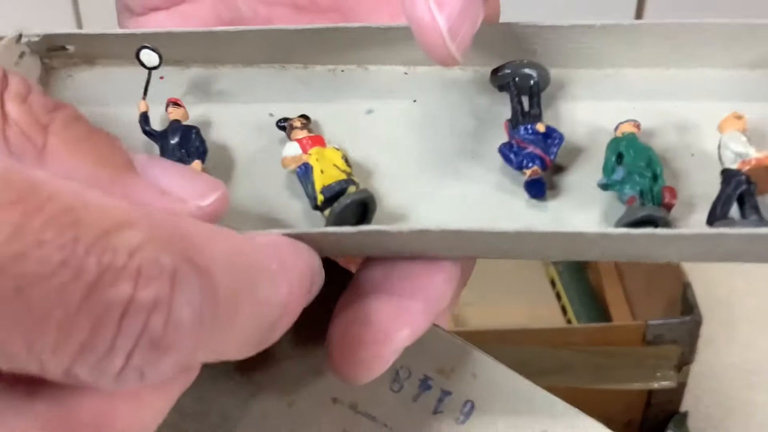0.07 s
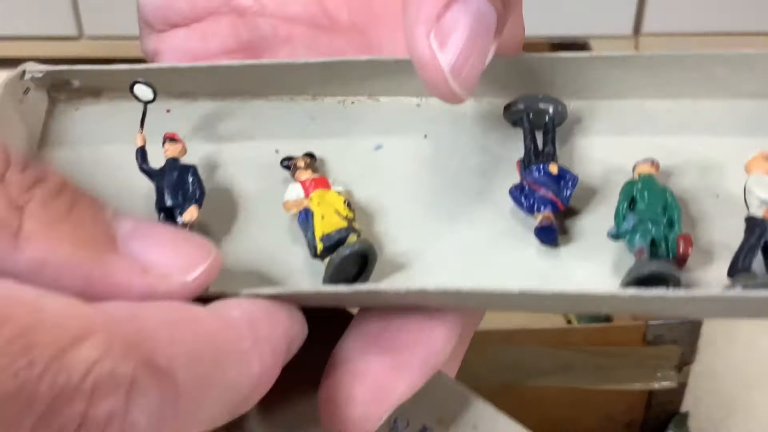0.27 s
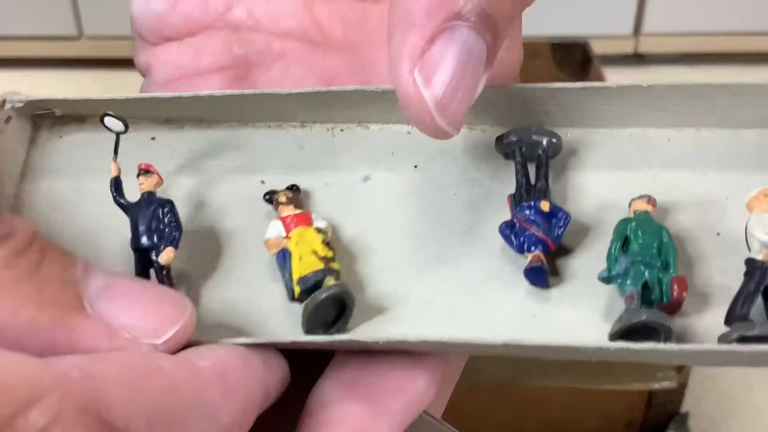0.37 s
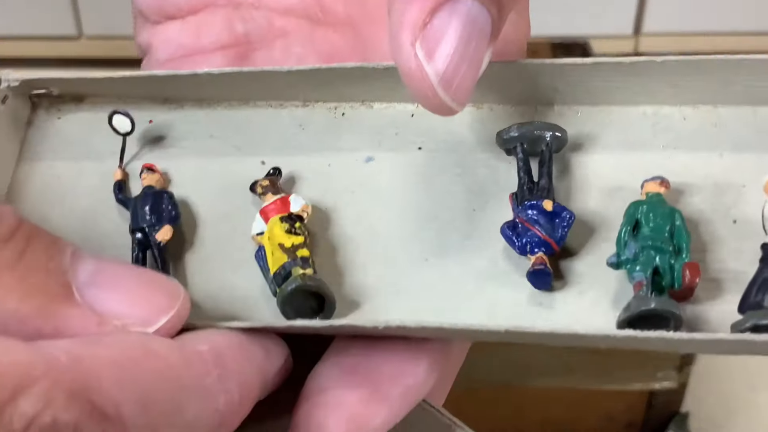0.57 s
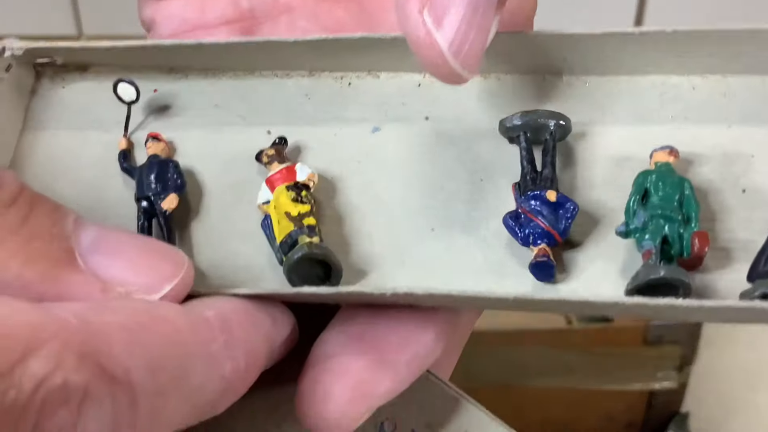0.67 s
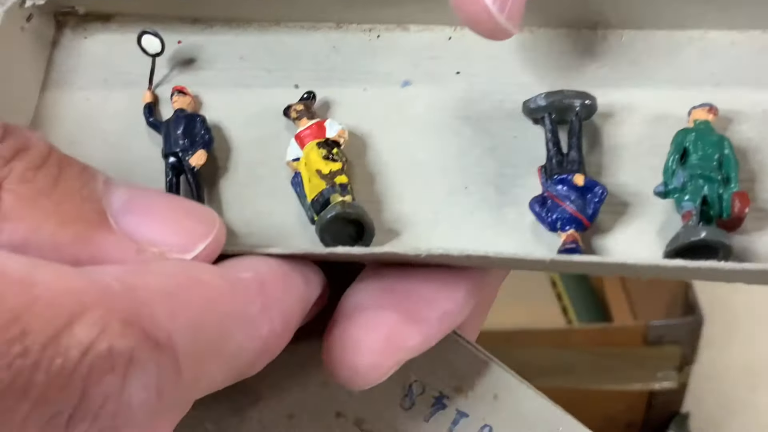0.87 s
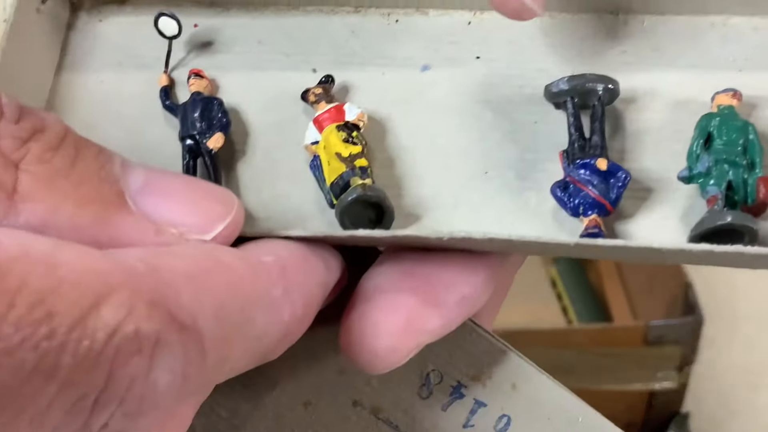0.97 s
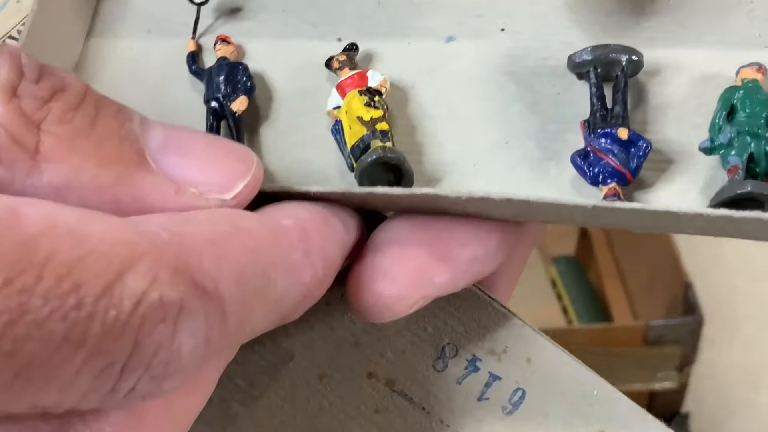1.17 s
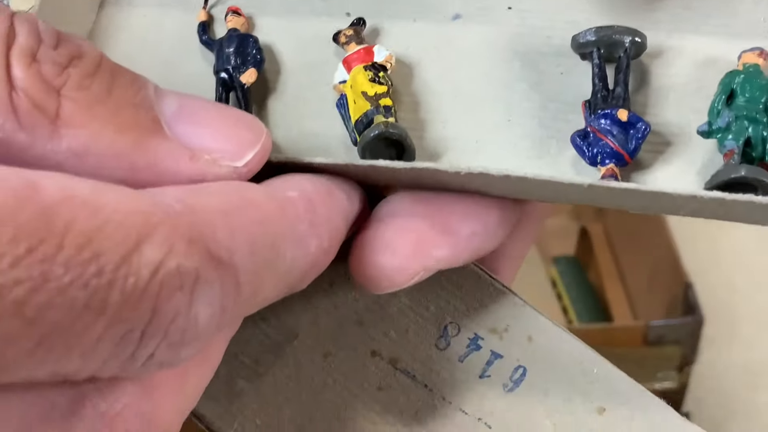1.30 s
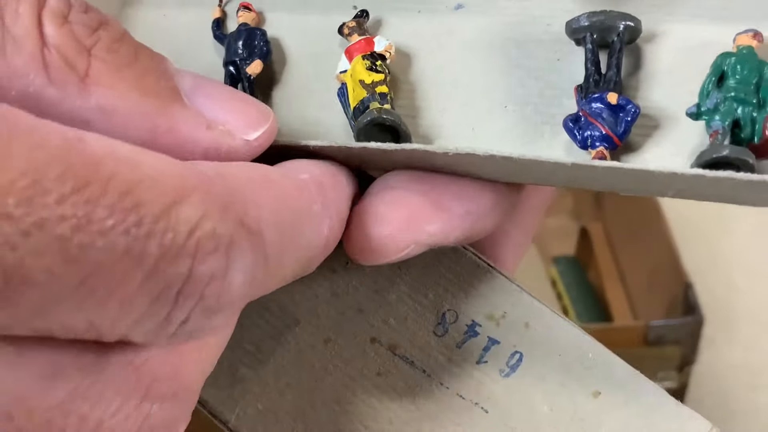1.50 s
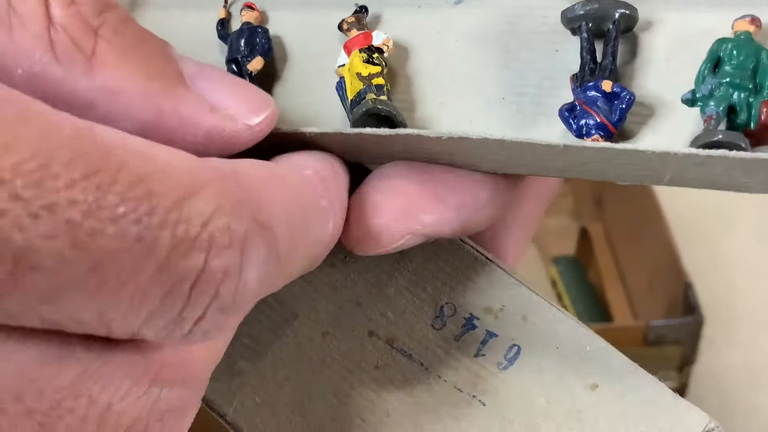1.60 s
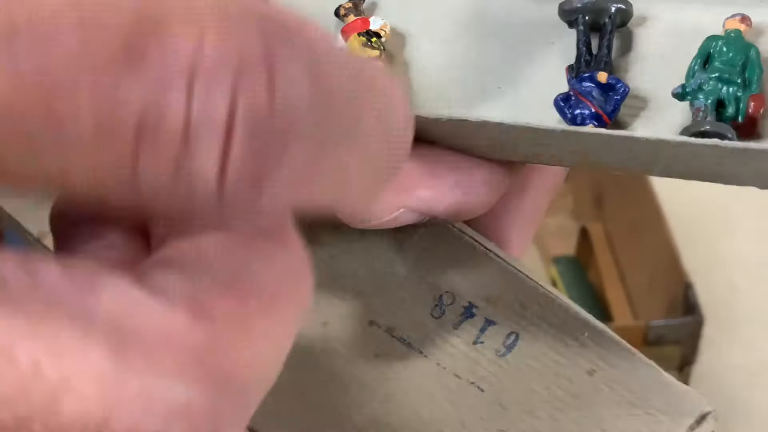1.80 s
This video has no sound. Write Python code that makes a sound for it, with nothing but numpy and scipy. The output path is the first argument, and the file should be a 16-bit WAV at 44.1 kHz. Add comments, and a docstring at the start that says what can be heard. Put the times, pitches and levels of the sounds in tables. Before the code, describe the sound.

A small cardboard tray is handled up close in a quiet room. Skin hiss and dry scraping swell from 0.2 to 0.4 s, with two quick taps near 0.24. A loud, sharp click lands at 0.44, a softer one at 0.51, then scraping and light taps around 0.7 to 0.8. After that it is nearly quiet, with brief faint scuffs near 1.26 and 1.7 over a low hum.

```python
"""A small cardboard tray is turned in two hands close to a phone, in a quiet room.
Skin rubs the card with a fine hiss, and the card scrapes and drags: random tiny slips, coloured by filters.
A few taps ring the tray's decaying modes, each with a crack of noise and a low thump; palms bump softly.
Sparse reflections, room noise and a faint wavering hum lie under it all.
The two microphones hear the sound with different delay, phase and tone."""
import sys
import numpy as np
from scipy import signal
from scipy.fft import rfft, irfft, next_fast_len
from scipy.io import wavfile
from scipy.ndimage import uniform_filter1d

SR = 44100
rng = np.random.default_rng(int(sys.argv[2]) if len(sys.argv) > 2 else 0)


def gain_from_decibels(decibels):
    """Convert decibel values to linear amplitude factors."""
    exponent = np.asarray(decibels, float) / 20
    return 10 ** exponent


def output_pcm(signal):
    """Save a mono or channel-first signal as 16-bit PCM at the path in sys.argv[1].

    Samples are clipped to [-1, 1] before scaling.
    """
    pcm = np.clip(np.atleast_2d(signal).T, -1, 1) * 32767
    wavfile.write(sys.argv[1], SR, np.round(pcm).astype(np.int16))


N = 81585  # length in samples


def evened(x):
    """Scales to rms 1."""
    return x / np.sqrt(np.mean(x ** 2) + 1e-20)


def read(points, hz):
    """Reads a table on a log-frequency axis."""
    f, value = np.transpose(points)
    return np.interp(np.log(hz + 1), np.log(f + 1), value)


def colour(x, gain):
    """Filters by a gain given as a function of frequency."""
    size = next_fast_len(x.shape[-1] + 4096)
    spectrum = rfft(x, size) * gain(np.fft.rfftfreq(size, 1 / SR))
    return irfft(spectrum, size)[..., :x.shape[-1]]


def grit(per_s, spread_db, flutter_db):
    """Tiny slips at random moments and sizes, clumped by a quick flutter."""
    size = gain_from_decibels(spread_db * np.minimum(rng.exponential(1, N), 5))
    sign = rng.choice([-1., 1.], N)
    happens = rng.random(N) < per_s / SR
    flutter = evened(uniform_filter1d(uniform_filter1d(rng.standard_normal(N), 250), 250))
    return size * sign * happens * gain_from_decibels(flutter_db * flutter)


# How the hands move. Each row: time in seconds, then the levels in dB of the dull drag,
# the scrape and the skin hiss.
MOTION = [(0.0, -55, -60, -56.5), (0.034, -49.5, -54.5, -48), (0.114, -62.5, -63, -54.5),
          (0.126, -68, -95, -64), (0.152, -62, -66, -61.5), (0.164, -63, -56, -42),
          (0.178, -59, -60.5, -54.5), (0.23, -47, -39.5, -41), (0.26, -47, -48.5, -38),
          (0.338, -45, -38.5, -39), (0.4, -44.5, -41, -51.5), (0.43, -50.5, -55, -58),
          (0.47, -59, -53, -79), (0.486, -70.5, -55, -49), (0.505, -50, -54, -72),
          (0.54, -45.5, -52.5, -55), (0.596, -48, -45.5, -54), (0.658, -56.5, -51.5, -58.5),
          (0.744, -46, -49.5, -54), (0.756, -52.5, -48, -50.5), (0.78, -52.5, -61.5, -64),
          (0.79, -53.5, -61, -59), (0.83, -55, -87, -103), (0.87, -55, -62.5, -84),
          (0.902, -56.5, -67, -101), (1.08, -62.5, -78.5, -71.5), (1.1, -61.5, -77, -77),
          (1.126, -60, -63, -60), (1.178, -65, -76, -66.5), (1.21, -64.5, -89, -70),
          (1.228, -69, -68.5, -68), (1.264, -62, -46, -46), (1.366, -70, -99, -79),
          (1.398, -68.5, -74, -62), (1.528, -68.5, -67, -58.5), (1.564, -90.5, -77, -62.5),
          (1.592, -100, -105, -75), (1.626, -88, -62.5, -51), (1.674, -62, -74, -58.5),
          (1.686, -104, -53.5, -49.5), (1.698, -53, -51.5, -53.5), (1.718, -65, -61.5, -56.5),
          (1.758, -76, -59, -55), (1.822, -91.5, -104, -75), (1.85, -73, -82, -67)]


def motion(column):
    """Gain curve of one rubbing layer, gliding from row to row in dB."""
    rows = np.array(MOTION)
    return gain_from_decibels(np.interp(np.arange(N) / SR, rows[:, 0], rows[:, column]))


# Tone of the fingertips on card. Each row: frequency in Hz, gain in dB.
HISS = [(1000, -21.5), (2500, -2), (4500, 0), (6500, -5.5), (8300, -7.5), (10000, -2.5), (11700, 1),
        (13500, -3.5), (15600, -3.5)]


def skin():
    """Fingertips brush the card: very dense fine grit."""
    slips = grit(per_s=9000, spread_db=1.5, flutter_db=1.3)
    x = colour(slips, lambda hz: gain_from_decibels(read(HISS, hz)))
    return motion(column=3) * evened(x)


def ring(hz, t60):
    """One decaying mode: a sine that falls 60 dB in t60 seconds."""
    t = np.arange(4096) / SR
    return np.sin(2 * np.pi * hz * t) * gain_from_decibels(-60 * t / t60)


# The tones in which the tray rings. Each row: frequency in Hz, relative level in dB,
# time to fall 60 dB in seconds.
TRAY = [(367, -34, 0.028), (640, 0, 0.081), (790, -26, 0.025), (1330, -17, 0.09), (1600, 9, 0.01),
        (2158, 5, 0.026), (2616, 12, 0.0067), (3155, 5, 0.0098), (3600, 6.5, 0.0076), (4300, -5.5, .02),
        (4600, -4.5, 0.024), (5200, -1.5, 0.015), (5760, -8, 0.041)]


def tray(spot_hz, spot_db):
    """The tray's answer to one click; spot_db per squared octave favours modes near the struck spot."""
    modes = []
    for hz, db, t60 in TRAY:
        octaves = np.log2(hz / spot_hz)
        modes.append(gain_from_decibels(db + spot_db * octaves ** 2) * ring(hz, t60))
    return sum(modes)


def resonate(x, hz, width):
    """A moving resonance of gain 1: shifts its pitch down to zero, smooths, and shifts back."""
    turn = np.exp(2j * np.pi * np.cumsum(hz) / SR)
    r = np.exp(-np.pi * width / SR)
    return 2 * (turn * signal.lfilter([1 - r], [1, -r], x / turn)).real


# Tone of the scraping fibres. Each row: frequency in Hz, gain in dB.
SCRAPE = [(300, -27.5), (1000, -15.5), (2000, -3.5), (3000, -3.5), (5000, 1), (6200, -8), (9000, -18)]
# Strongest scrape resonance, moving with the grip. Each row: time in seconds, frequency in Hz.
GRIP = [(0, 4600), (.2, 5200), (0.401, 5270), (.56, 4600), (0.638, 3470), (.8, 3600), (1.1, 4430),
        (1.649, 4800), (1.701, 3510), (1.85, 4620)]


def scrape():
    """Fingers catch on the card fibres; part of each slip rings the tray."""
    ring_share = 0.37
    grip_width_hz, grip_db = 350, 5
    slips = grit(per_s=2900, spread_db=3.5, flutter_db=2.6)
    every_mode = tray(spot_hz=1000, spot_db=0)  # at 0 dB no spot is favoured
    rung = signal.oaconvolve(slips, every_mode)[:N]
    mix = ring_share * evened(rung) + (1 - ring_share) * evened(slips)
    x = colour(mix, lambda hz: gain_from_decibels(read(SCRAPE, hz)))
    grip_hz = np.interp(np.arange(N) / SR, *np.transpose(GRIP))
    x = x + gain_from_decibels(grip_db) * resonate(x, grip_hz, grip_width_hz)
    return motion(column=2) * evened(x)


# Tone of the tray's low hollows. Each row: frequency in Hz, gain in dB.
DRAG = [(150, -28), (260, -7), (440, -5.5), (570, 0), (750, -7.5), (1000, -8.5), (1280, -3.5), (1600, -8.5),
        (1900, -21.5), (3000, -37)]


def drag():
    """The tray's base slides on the palm: slow slips heard through the low hollows."""
    slips = grit(per_s=900, spread_db=-1.5, flutter_db=1.18)
    x = colour(slips, lambda hz: gain_from_decibels(read(DRAG, hz)))
    return motion(column=1) * evened(x)


def patchy(x):
    """Random time-frequency patches make the rubbing louder and softer, unevenly across pitch."""
    patch_db = 2.5  # rms
    z = signal.stft(x, nperseg=256)[2]
    over_pitch = uniform_filter1d(rng.standard_normal(z.shape), 5, 0)
    patches = uniform_filter1d(over_pitch, 14, 1)
    return signal.istft(z * gain_from_decibels(patch_db * evened(patches)), nperseg=256)[1][:N]


# Taps on the tray. Each row: start in seconds, level in dB, pitch of the struck spot in Hz,
# contact length in seconds, thump in dB relative to that level.
TAPS = [(0.166, -32.5, 3300, .003, -47), (.2378, -23, 1300, 0.0048, -15), (0.2507, -24, 1600, 0.0017, -21),
        (.4417, -3, 2270, 0.0073, -23), (.466, -50, 2100, 0.0063, -17.5), (.5135, -17, 2450, 0.0074, -32),
        (0.533, -65, 1000, .004, 1), (0.599, -42.5, 590, 0.004, 4), (0.688, -33.5, 3600, 0.0019, -13),
        (0.7347, -26.5, 1500, 0.0033, -20), (0.762, -38.5, 2600, 0.0013, -7.5),
        (0.775, -26, 1700, 0.0023, -13.5), (1.702, -47.5, 597, 0.0069, -49)]


def taps():
    """Each tap: a sharp crack, a short rattling contact that rings the tray, and a low thump."""
    thump_hz, thump_t60 = 275, .035
    spot_db = -5  # fall per squared octave away from the struck spot's pitch
    rattle = .09
    soft_s_per_db = 1.1e-5  # weaker taps land softer and duller
    damp_db, damp_s = -16, .002  # fingers damp the ring once the contact ends
    crack_db, crack_s = -5, .0006
    hardness = 1.1  # dB more crack, relative to the ring, per dB of tap
    out, t = np.zeros(N + 8192), np.arange(4096) / SR
    chance = rng.standard_normal((len(TAPS), 2, 4096))
    thump = signal.oaconvolve(ring(thump_hz, thump_t60), np.hanning(90))[:4096]  # soft start
    thump /= abs(thump).max()
    for (s, db, spot_hz, contact, thump_db), (rattle_noise, crack_noise) in zip(TAPS, chance):
        push = rattle * rattle_noise * (t < contact) * np.exp(-t / contact)
        push[0] += 1  # the first touch
        push = np.convolve(push, np.hanning(3 + round(abs(db) * soft_s_per_db * SR)))
        body = signal.oaconvolve(push, tray(spot_hz, spot_db))[:4096]
        body *= gain_from_decibels(damp_db * np.clip((t - contact) / damp_s, 0, 1))
        body /= abs(body).max()
        hard = gain_from_decibels(crack_db + hardness * (db - 5))
        crack_fade = np.exp(-t / crack_s) + 0.19 * np.exp(-2 * t / contact)
        body += hard * np.diff(crack_noise, prepend=0) * crack_fade
        body += gain_from_decibels(thump_db) * thump
        out[round(s * SR):][:4096] += gain_from_decibels(db) * body
    # a high-pass at 180 Hz clears the offset left by the damped sines
    high_pass = signal.butter(2, 180, "high", fs=SR, output="sos")
    return signal.sosfilt(high_pass, out[:N])


# Soft bumps of the palms. Each row: start in seconds, peak of the swell in dB, pitch in Hz.
BUMPS = [(.1, -57.5, 91.8), (0.241, -53.5, 61), (0.351, -53.5, 111), (.55, -56.5, 93), (0.617, -56.5, 91),
         (.76, -83, 80), (1.049, -64.5, 98), (1.309, -63.5, 81.8)]


def bumps():
    """Each bump is a cycle or two of low pressure with a soft start."""
    rise_s = 0.0088
    out, t = np.zeros(N + 4096), np.arange(4096) / SR
    swell = np.e * t / rise_s * np.exp(-t / rise_s)  # reaches 1 at rise_s
    for s, db, hz in BUMPS:
        out[round(s * SR):][:4096] += gain_from_decibels(db) * swell * np.sin(2 * np.pi * hz * t)
    return out[:N]


def apart(x):
    """Makes two channels alike in the bass, growing apart around 180 Hz."""
    return x[0] + colour(x - x[0], lambda hz: hz ** 2 / (hz ** 2 + 180 ** 2))


# How fast the reflections die. Each row: frequency in Hz, time to fall 60 dB in seconds.
ROOM = [(150, 0.3), (1000, 0.3), (4000, 0.12), (12000, .08)]


def room(x):
    """Sparse reflections, different at each microphone, each band dying at its own speed."""
    echo = np.zeros((2, SR // 2))
    at = np.arange(200, SR // 2 - 20, 20)  # one reflection in every 20 samples
    at = at + rng.integers(0, 20, (2, len(at)))
    np.put_along_axis(echo, at, rng.choice([-1., 1.], at.shape), 1)
    hz, t, z = signal.stft(echo, SR, nperseg=128)
    decay = gain_from_decibels(-60 * t / read(ROOM, hz)[:, None])
    tail = signal.istft(z * decay, SR, nperseg=128)[1]
    return signal.fftconvolve(x[None], tail / np.linalg.norm(tail[0]), axes=1)[:, :N]


# Tone of the room noise. Each row: frequency in Hz, gain in dB.
FLOOR = [(25, -8.5), (50, -3.5), (110, -29), (180, -9.5), (400, -13.5), (1000, -18), (3000, -21.5),
         (8000, -24.5), (15500, -36.5)]


def air():
    """Room noise, partly shared by the microphones, and a wavering hum of narrow-band noise."""
    floor_db, hum_db = -72, -76  # rms
    hum_hz, hum_width_hz = 91.1, 15
    noise = rng.standard_normal((3, N))
    wash = colour(apart(noise[0] + 1.1 * noise[1:]), lambda hz: gain_from_decibels(read(FLOOR, hz)))
    hum = colour(rng.standard_normal(N), lambda hz: 1 / (1 + (2 * (hz - hum_hz) / hum_width_hz) ** 2))
    return gain_from_decibels(floor_db) * evened(wash) + gain_from_decibels(hum_db) * evened(hum)


def scene():
    """Hands and tray, their reflections and the room air."""
    room_db = -15.5
    near = patchy(drag() + scrape() + skin()) + taps()
    return near + bumps() + gain_from_decibels(room_db) * apart(room(near)) + air()


def top_cut(x):
    """Nothing passes above the cut-off."""
    return signal.sosfilt(signal.butter(12, 17030, fs=SR, output="sos"), x)


# Phase of the left channel after its lag. Each row: frequency in Hz, phase lead in radians.
LEFT_LEAD = [(0, 0), (90, .36), (260, 2), (430, 3.7), (600, 6.2), (900, 10.5), (1200, 9.5), (1700, 9.5),
             (2000, 8.7), (3000, 9.2), (4300, 8.2), (5600, 7.3), (6900, 8.1), (16000, 15.2), (22050, 19.9)]
# Tone of the left channel. Each row: frequency in Hz, gain in dB.
LEFT_GAIN = [(30, 0), (90, -1.4), (300, -3), (500, -.6), (850, -1.5), (1100, -8), (2100, -5), (2600, -.6),
             (3400, -3), (4300, 3), (5300, -2), (7500, 1.5), (11000, -.6)]


def record(dry):
    """The left channel is delayed, shaded and phase-turned; then a band edge cuts both above 15.8 kHz."""
    lag_s = 40 / SR
    edge_hz, edge_db = 15800, -30
    f, lead = np.transpose(LEFT_LEAD)

    def left_response(hz):
        phase = np.interp(hz, f, lead) - 2 * np.pi * hz * lag_s
        return gain_from_decibels(read(LEFT_GAIN, hz)) * np.exp(1j * phase)

    left = colour(dry[0], left_response)
    both = np.array([left, dry[1]])
    both = colour(both, lambda hz: gain_from_decibels(edge_db * np.clip((hz - edge_hz) / 150, 0, 1)))
    return top_cut(both)


dry = scene()
out = record(dry)
output_pcm(out)
```